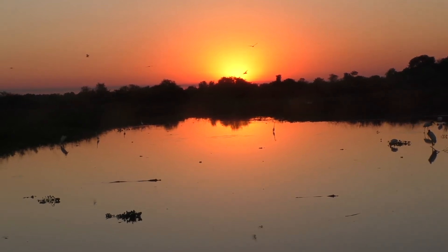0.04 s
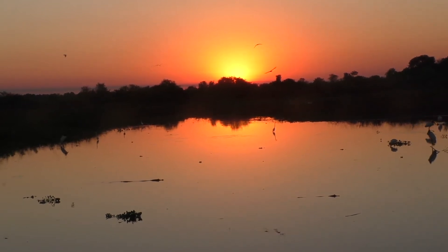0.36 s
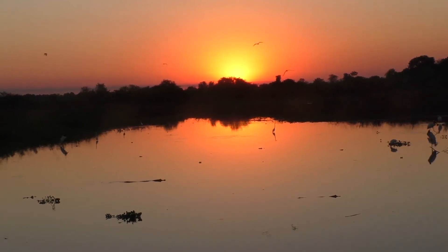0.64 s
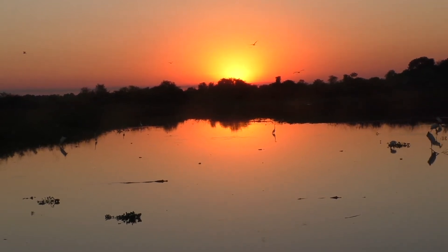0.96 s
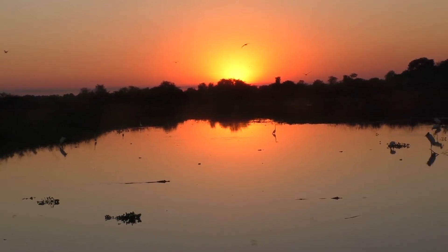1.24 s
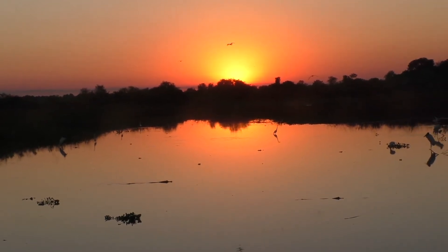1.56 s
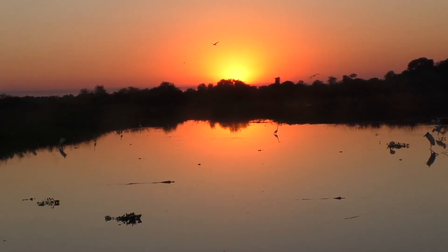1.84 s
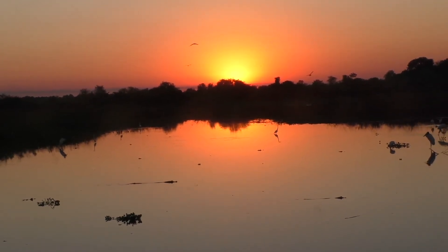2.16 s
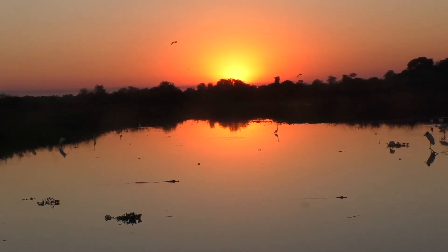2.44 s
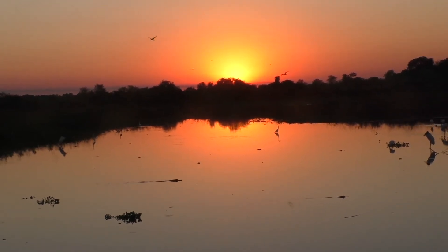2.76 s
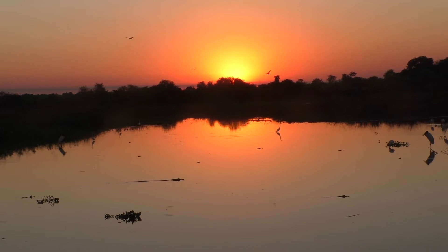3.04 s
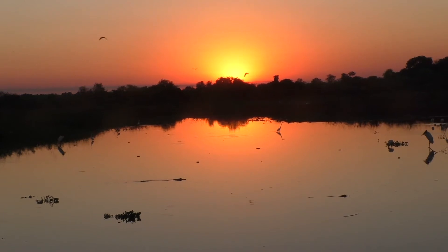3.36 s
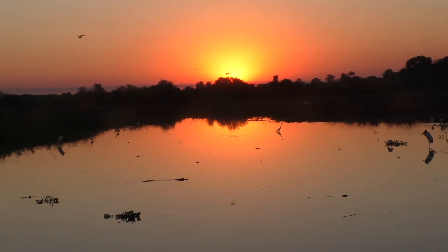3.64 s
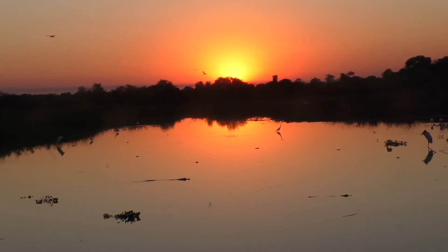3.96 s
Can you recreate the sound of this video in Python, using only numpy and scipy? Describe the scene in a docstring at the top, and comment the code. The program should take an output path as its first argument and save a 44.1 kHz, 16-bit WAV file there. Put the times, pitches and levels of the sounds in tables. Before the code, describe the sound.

A nearby bird on the left gives five harsh, raspy two-note calls, ending at about 1.3 seconds. Farther off, quick falling chirps repeat throughout, slowly weakening. Nasal bird wails come at the start, around 1.6 to 2 seconds and after 3.2 seconds, with faint whistles and croaks. Small ticks and a soft knock sound near 1.7 seconds. A faint dry rattle closes, over a low open-air rumble.

```python
"""A near bird on the left gives five harsh two-note calls, then stops; it is dawn over a still swamp.
Its notes are raspy pitch sweeps shaped by its throat, each doubled by a quick echo. Farther off, two
birds repeat falling chirps, one wails nasally, thin whistles pass, and pulsing croaks end in a dry
rattle. Small ticks, a hollow knock and one tiny rising note sound close by. Reeds and trees scatter
the calls, over a distant chorus and the low rumble of the open air."""
import sys
import numpy as np
from scipy import signal
from scipy.fft import rfft, irfft
from scipy.io import wavfile

SR = 44100
rng = np.random.default_rng(int(sys.argv[2]) if len(sys.argv) > 2 else 0)


def store_pcm(level_fs):
    """Save levels as 16-bit WAV."""
    pcm = np.round(np.clip(level_fs, -1, 1) * 32767).astype(np.int16)
    wavfile.write(sys.argv[1], SR, np.atleast_2d(pcm).T)


N = 176400   # 4 seconds

# falling first note of each harsh call: t/s, length/s, starting f/Hz, level/dB, treble/dB per octave
YELPS = [(0.04, .028, 2856, -31.5, 1), (0.287, 0.028, 2974, -32.5, -0.5), (0.544, 0.027, 2833, -32.5, 0.5),
         (.822, 0.023, 2722, -32.5, -6), (1.114, 0.027, 2680, -36, -2)]
# arched second note of each harsh call: t/s, length/s, top f/Hz, level/dB, treble/dB per octave
YAPS = [(0.139, .043, 2302, -31.5, 2.5), (0.395, 0.042, 2251, -32, 2), (0.658, .040, 2017, -30.5, 0.5),
        (0.941, .041, 2046, -32, 0.5), (1.239, 0.04, 2060, -32.5, 0)]
# how the harsh bird's throat favours some frequencies: f/Hz, level/dB
THROAT = [(900, -16), (1400, -25.5), (2100, -6.5), (2750, 0), (3400, -7), (4200, -12.5), (4900, -17.5),
          (6000, -12.5), (6900, -15), (8000, -20), (10500, -27), (15000, -42)]
# how much louder the harsh notes are on the left: f/Hz, left minus right/dB
HARSH_PAN = [(1200, 13), (2000, 7), (2800, 12), (4000, 7), (6000, -0.5), (8500, 1), (14000, 3)]
# hiss inside a harsh note: f/Hz, level/dB
NOTE_HISS = [(900, -22), (1400, -2), (2700, 7.5), (4600, -11), (5600, -0.5), (7500, -5.5), (9500, -14.5),
             (15000, -19)]
# hoarse hiss between the two notes of a call: f/Hz, level/dB
LINK_HISS = [(800, -23), (1300, -3.5), (2000, -8.5), (2700, 3), (3500, -10), (4700, -17.5), (5800, -21),
             (7400, -18), (9000, -27.5), (15000, -32)]
# chirps of the quick bird: t/s, starting f/Hz, level/dB
QUICK_CHIRPS = [(.105, 3226, -44.5), (.318, 3210, -45.5), (.514, 3200, -48), (.710, 3240, -44.5),
                (.895, 3120, -48.5), (1.083, 3120, -46), (1.27, 3190, -46), (1.446, 3155, -47),
                (1.630, 3120, -46.5), (1.809, 3120, -47), (1.986, 3120, -48.5), (2.166, 3145, -48),
                (2.343, 3106, -48), (2.518, 3060, -49), (2.695, 3045, -49.5), (2.873, 2985, -49),
                (3.046, 3045, -49.5), (3.217, 3065, -50.5), (3.388, 3000, -49.5), (3.563, 3020, -52),
                (3.739, 3030, -49.5), (3.909, 2960, -52)]
# chirps of the slower bird: t/s, starting f/Hz, level/dB
SLOW_CHIRPS = [(.02, 3500, -48.5), (.345, 3450, -52.5), (.995, 3290, -52), (1.293, 3310, -53),
               (1.584, 3290, -55), (1.862, 3320, -55), (2.135, 3290, -59.5), (2.408, 3300, -61),
               (2.668, 3310, -64), (2.948, 3160, -55), (3.225, 3110, -50.5), (3.492, 3170, -56.5),
               (3.756, 3150, -56.5)]
# nasal wails: t/s, length/s, start f/Hz, middle f/Hz, end f/Hz, level/dB, boost above harmonic 2/dB
WAILS = [(0, 0.1, 938, 1026, 895, -38.5, -2), (0.169, 0.0824, 782, 822, 865, -51.5, 12),
         (.254, 0.056, 884, 906, 897, -42, -4), (.3, 0.12, 1000, 1009, 889, -43, 3),
         (1.622, 0.14, 909, 953, 851, -45, -6), (1.795, 0.161, 770, 804, 799, -50, 2),
         (1.96, 0.096, 888, 960, 878, -49.5, -7), (2.03, 0.05, 819, 750, 740, -53, 1),
         (3.203, 0.103, 916, 963, 893, -42, -15), (3.365, 0.11, 787, 835, 842, -51, 4.5),
         (3.476, 0.18, 972, 939, 919, -42.5, -2.5)]
# a wail's harmonics (whole multiples of its pitch), lowest first: level/dB
WAIL_HARMONICS = [-23, -7.5, -13.5, -23.5, -28.5, -36, -37]
# raspy noise in a wail: f/Hz, level/dB
WAIL_RASP = [(700, -11), (1200, -4.5), (1900, 12), (3000, 3.5), (4200, -7), (5500, -3.5), (7000, -10),
             (12000, -20)]
# thin whistles: t/s, length/s, start f/Hz, middle f/Hz, end f/Hz, level/dB, left minus right/dB
WHISTLES = [(0.591, 0.15, 4040, 4180, 4300, -64, -9), (.76, 0.2, 4300, 4390, 4270, -64.5, -7),
            (1.76, .11, 4160, 4230, 4320, -65, -4), (1.92, 0.19, 4320, 4270, 4020, -69.5, -7),
            (2.955, .17, 4350, 4380, 4380, -69, -6.5), (3.299, 0.188, 2425, 2500, 2510, -65.5, 13),
            (3.65, 0.05, 4700, 5070, 5500, -68, 3), (3.78, 0.13, 2670, 2698, 2780, -61.5, 16),
            (3.981, 0.063, 2680, 2880, 2920, -53.5, -5)]
# short low croaks: t/s, length/s, throat ringing f/Hz, level/dB
CROAKS = [(1.625, 0.059, 1610, -55.5), (2.421, 0.047, 1530, -57), (2.432, .02, 1080, -56),
          (2.527, 0.068, 1110, -63), (2.619, 0.073, 1590, -60), (3.265, 0.019, 1340, -49.5),
          (3.496, 0.014, 1220, -41.5), (3.73, 0.017, 1250, -44.5), (3.745, .04, 1450, -57)]
# noisy part of the rattle: f/Hz, level/dB
RATTLE_NOISE = [(60, -15), (150, 3), (330, 0.5), (700, -3.5), (1500, -4), (4000, -17), (12000, -31)]
# small ticks close by: t/s, level/dB, time to fade by 60 dB/s
TICKS = [(0.7718, -39.5, 0.012), (1.646, -49, 0.086), (1.767, -53.5, 0.0063), (1.875, -45.5, 0.018),
         (2.112, -46.5, 0.024), (2.467, -47.5, 0.0075)]
# noise of a tick: f/Hz, level/dB
TICK_NOISE = [(150, -22), (600, -8), (1500, 7), (3000, -9), (6000, -4), (9000, -14), (15000, -12.5)]
# ringing tones of the hollow knock: f/Hz, level/dB, time to fade by 60 dB/s
KNOCK_TONES = [(216, -44.5, 0.069), (302, -43, 0.039), (560, -42, 0.048), (680, -49.5, .045)]
# tone colour of the echoes from the shore: f/Hz, level/dB
SHORE_COLOUR = [(500, 6.5), (1400, 3.5), (2700, 2), (4200, 3), (5500, 2), (7500, 0.5), (14000, 16)]
# rumble and hiss of the open air: f/Hz, level/dB
AIR_NOISE = [(15, -6), (25, -4), (107, 2), (253, 0.5), (469, -5), (582, -14), (804, -15), (970, -8.5),
             (1300, -10.5), (1530, -9), (2230, -11), (2920, -9.5), (3340, -16), (4150, -20), (6210, -30),
             (12500, -27), (15500, -29.5)]
# how alike the air sounds in both ears: f/Hz, likeness (0 unrelated, 1 the same)
AIR_LIKENESS = [(50, .15), (250, 0.14), (600, 0.12), (1200, 0.22), (3000, 0.25), (6000, 0.81),
                (13000, 0.54)]

ECHO_DELAY_S, CUTOFF_HZ = .00927, 15800


def harsh_bird():
    """Each call is a plunging yelp, a hoarse hiss and an arched yap; a near surface echoes them once."""
    out = np.zeros((2, N))
    for start, length, hz, db, treble_db in YELPS:
        fall = (1 - np.cos(np.pi * progress(length))) / 2
        add(out, start, harsh_note(hz * .43 ** fall, db, treble_db))   # drops to 43% of its pitch
    for start, length, hz, db, treble_db in YAPS:
        arch = np.abs(np.sin(np.pi * progress(length))) ** 1.15
        add(out, start, harsh_note(hz * (.6 + .4 * arch), db, treble_db))
    for yelp, yap in zip(YELPS, YAPS):
        yelp_end = yelp[0] + yelp[1]
        u = progress(yap[0] - yelp_end)
        sagging_level = from_db(-43.5 - 10.5 * np.sin(np.pi * u))
        add(out, yelp_end, pan(5.4) * sagging_level * noise(len(u), LINK_HISS))
    add(out, ECHO_DELAY_S, from_db(-5.5) * out)
    return out


def harsh_note(hz, db, treble_db):
    """A raspy sweep of harmonics shaped by the throat, brightest halfway, with a growing hiss."""
    u, length = np.linspace(0, 1, len(hz)), len(hz) / SR
    phase = 2 * np.pi * np.cumsum(hz * (1 + .009 * wobble(u, length, 1270))) / SR
    ear_phase = phase + np.pi * hz * .00001 * [[1], [-1]]   # the left ear hears it first
    tilt = treble_db - 7.5 * (1 - np.sin(np.pi * u))   # dB per octave, duller at both ends
    wave = 0
    for k in range(1, 13):
        harmonic_hz = k * hz
        treble_octaves = np.log2(np.maximum(harmonic_hz / 2330, 1))
        gain = from_db(at_hz(THROAT, harmonic_hz) + tilt * treble_octaves) * (harmonic_hz < CUTOFF_HZ)
        wave = wave + gain * pan(at_hz(HARSH_PAN, harmonic_hz)) * np.sin(k * ear_phase)
    hiss = from_db(-16.5) * noise(len(u), NOTE_HISS) * np.sin(np.pi * u / 2) * pan(2)
    rasp = 1 + .18 * wobble(u, length, 2200)
    return from_db(db) * (wave * rasp + hiss) * fade(u, length, .002, .002)


def chirping_bird(notes, length_s, fall_share):
    """Nearly pure notes that fall ever faster and fade as they fall, no two quite alike."""
    out, u = np.zeros(N), progress(length_s)
    for start, hz, db in notes:
        level = from_db(db - 6.5 * u ** 2) * fade(u, length_s, .0075, .0077)
        glide = hz * (1 - fall_share * u ** 1.41)
        waver = 1 + .0083 * wobble(u, length_s, 67)
        add(out, start, level * tone(glide * waver, [0, -40], jitter=.012, flutter=.25))
    return out * pan(-.5)


def wailing_bird():
    """Drawn-out nasal notes with a little rasp that break between a higher and a lower voice."""
    out = np.zeros(N)
    for start, length, *pitches, db, upper_db in WAILS:
        u = progress(length)
        hz = arc(u, *pitches)
        harmonics_db = []
        for k, level in enumerate(WAIL_HARMONICS, 1):
            nasal_db = 10.5 / (1 + ((k * hz - 4730) / 59) ** 2)   # a narrow ring at 4730 Hz
            harmonics_db.append(level + upper_db * (k > 2) + nasal_db)
        rasp = from_db(-15) * noise(len(u), WAIL_RASP)
        voice = tone(hz, harmonics_db, jitter=.0096, flutter=.19)
        add(out, start, from_db(db) * fade(u, length, .0047, .011) * (voice + rasp))
    return out * pan(-1.3)


def whistling_birds():
    """Thin whistles, each a single gently wavering tone."""
    out = np.zeros((2, N))
    for start, length, *pitches, db, pan_db in WHISTLES:
        u = progress(length)
        hz = arc(u, *pitches) * (1 + .0045 * wobble(u, length, 33))
        voice = tone(hz, [0], jitter=.012, flutter=.11)
        add(out, start, pan(pan_db) * from_db(db) * fade(u, length, .015, .019) * voice)
    return out


def croaks(pulses_per_s=250, ring_width_hz=154):
    """Uneven pulses make a throat ring at one frequency."""
    out, decay = np.zeros(N), np.exp(-np.pi * ring_width_hz / SR)
    for start, length, hz, db in CROAKS:
        u = progress(length)
        rate = pulses_per_s * np.exp(.303 * wobble(u, length, 250))
        pulses = np.diff(np.floor(np.cumsum(rate) / SR), prepend=-1)
        throat = [1, -2 * decay * np.cos(2 * np.pi * hz / SR), decay ** 2]
        ringing = signal.lfilter([1, 0, -1], throat, pulses)
        band = signal.butter(2, [hz / 1.24, hz * 1.27], "band", fs=SR, output="sos")
        voice = unit_power(signal.sosfilt(band, ringing))
        add(out, start, from_db(db) * voice * fade(u, length, .004, .016))
    return out * pan(-2.1)


def rattle(start=3.735, throbs_per_s=76):
    """A dry rattle: a sinking low note and some noise throb loosely together."""
    out, length = np.zeros(N), N / SR - start
    u = progress(length)
    rate = throbs_per_s * (1 + .23 * wobble(u, length, 73.7))
    throb = np.abs(np.sin(np.pi * np.cumsum(rate) / SR)) ** .61
    hz = 1095 - 300 * u * length
    voice = tone(hz, [-2, -26, -30, -21.5], jitter=.063, flutter=.37)
    body = from_db(-1.5) * noise(len(u), RATTLE_NOISE)
    add(out, start, from_db(-53.5) * unit_power(throb * (voice + body)))
    return out * pan(-1.9)


def small_bird(start=3.259, length_s=.014):
    """One tiny rising note close by, with a single faint echo."""
    out, u = np.zeros(N), progress(length_s)
    voice = tone(arc(u, 5900, 6850, 7000), [0, -16], jitter=.0044, flutter=.1)
    add(out, start, from_db(-43.5) * fade(u, length_s, .0075, .003) * voice)
    add(out, ECHO_DELAY_S, from_db(-17) * out)
    return out * pan(2.7)


def ticks_and_knock(knock_start=1.647):
    """Each tick is a quick burst of noise; the hollow knock is four low tones dying away."""
    out, t = np.zeros(N), np.arange(SR // 10) / SR
    for start, db, fade_s in TICKS:
        add(out, start, from_db(db - 60 * t / fade_s) * noise(len(t), TICK_NOISE))
    for hz, db, fade_s in KNOCK_TONES:
        add(out, knock_start, from_db(db - 60 * t / fade_s) * np.sin(2 * np.pi * hz * t))
    return out * pan(-2.8)


def distant_chorus(notes_per_s=26, low_hz=1091, high_hz=3566):
    """Faint sliding notes of many distant birds, scattered at random."""
    out = np.zeros((2, N))
    for when, pitch, slide, span, loud, side in rng.random((int(notes_per_s * N / SR), 6)):
        u = progress(.0274 + .094 * span)
        start_hz = low_hz * (high_hz / low_hz) ** pitch
        hz = start_hz * (1 + .24 * (slide - .6) * u)
        level = from_db(-61.5 - 14 * (1 - loud)) * np.sin(np.pi * u)
        voice = tone(hz, [0, -26], jitter=.031, flutter=.73)
        add(out, when * N / SR, pan(8 * (side - .5)) * level * voice)
    return out


def shore_echoes(sound, build_s=.0063, fade_s=.43):
    """Reeds and trees scatter many small echoes, which die away by 60 dB in fade_s."""
    t = np.arange(SR) / SR
    scatter = colour(two_ears(*rng.standard_normal((2, SR)), likeness=.22), SHORE_COLOUR)
    shape = np.exp(-np.log(1000) * t / fade_s) * (1 - np.exp(-t / build_s))
    echoes = scatter * shape / np.sqrt(2 * np.sum(shape ** 2))
    return signal.fftconvolve(sound, echoes, axes=1)[:, :N]


def open_air():
    """Low rumble of the open air and a soft hiss, with the low sounds spread widest."""
    shared, apart = rfft(rng.standard_normal((2, N)))
    likeness = at_hz(AIR_LIKENESS, np.fft.rfftfreq(N, 1 / SR))
    air = irfft(two_ears(shared, apart, likeness), N)
    return from_db(-53.5) * unit_power(colour(air, AIR_NOISE)) * pan(1)


def tone(hz, harmonics_db, jitter, flutter):
    """A voice built from harmonics; jitter shakes its pitch and flutter shakes its loudness."""
    u, length = np.linspace(0, 1, len(hz)), len(hz) / SR
    phase = 2 * np.pi * np.cumsum(hz * (1 + jitter * wobble(u, length, 300))) / SR
    wave = sum(from_db(db) * np.sin(k * phase) for k, db in enumerate(harmonics_db, 1))
    return np.sqrt(2) * wave * (1 + flutter * wobble(u, length, 108))


def progress(length_s):
    """A ramp, called u elsewhere, that runs from 0 to 1 through a note."""
    return np.linspace(0, 1, max(int(length_s * SR), 10))


def wobble(u, length_s, rate_hz):
    """A random wander around zero that picks a new value rate_hz times a second."""
    return np.interp(u * length_s * rate_hz, np.arange(512), rng.standard_normal(512))


def fade(u, length_s, in_s, out_s):
    """Fade a note in, hold it, and fade it out."""
    ramp = np.minimum(u * length_s / in_s, (1 - u) * length_s / out_s)
    return np.sin(np.pi / 2 * np.clip(ramp, 0, 1)) ** 2


def arc(u, start, middle, end):
    """A smooth curve through three pitches."""
    return start * (1 - u) * (1 - 2 * u) + middle * 4 * u * (1 - u) + end * u * (2 * u - 1)


def noise(samples, table):
    """Noise of power 1 with the tone colour of a table."""
    return unit_power(colour(rng.standard_normal(samples), table))


def colour(x, table):
    """Turn each frequency up or down as a table says."""
    n = x.shape[-1]
    return irfft(rfft(x) * from_db(at_hz(table, np.fft.rfftfreq(n, 1 / SR))), n)


def at_hz(table, hz):
    """Read between a table's rows, with octaves evenly spaced."""
    freqs, values = np.transpose(table)
    return np.interp(np.log(np.maximum(hz, 1)), np.log(freqs), values)


def two_ears(shared, apart, likeness):
    """Blend two noises into a left and right that are partly alike."""
    return np.sqrt(1 + likeness) * shared + np.sqrt(1 - likeness) * apart * [[1], [-1]]


def pan(db):
    """Left and right gains; positive db is louder on the left."""
    return from_db(np.array([[.5], [-.5]]) * db)


def from_db(db):
    """Turn decibels into a multiplier."""
    return 10 ** (np.asarray(db) / 20)


def unit_power(x):
    """Scale a sound to an average power of 1."""
    return x / np.sqrt(np.mean(x ** 2) + 1e-20)


def add(out, start, x):
    """Mix x into out at a start time in seconds."""
    i = max(int(start * SR), 0)
    x = x[..., :max(N - i, 0)]
    out[..., i:i + x.shape[-1]] += x


def scene():
    """Near and far calls, their echoes, small close sounds and the open air."""
    near = harsh_bird()
    far = (chirping_bird(QUICK_CHIRPS, length_s=.045, fall_share=.2186)
           + chirping_bird(SLOW_CHIRPS, length_s=.064, fall_share=.1376)
           + wailing_bird() + whistling_birds() + croaks() + rattle() + distant_chorus())
    echoes = shore_echoes(from_db(-15) * near + from_db(-12) * far)
    return near + far + echoes + small_bird() + ticks_and_knock() + open_air()


def record(dry):
    """Cut away the very highest treble."""
    return signal.sosfilt(signal.ellip(10, .1, 70, CUTOFF_HZ, fs=SR, output="sos"), dry)


dry = scene()
out = record(dry)
store_pcm(out)
```